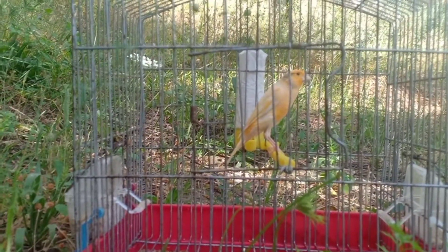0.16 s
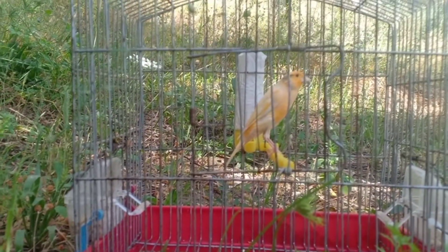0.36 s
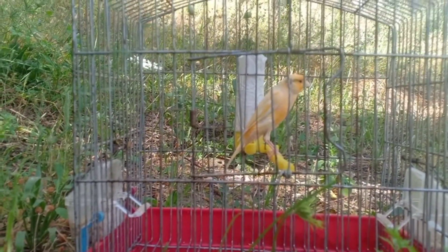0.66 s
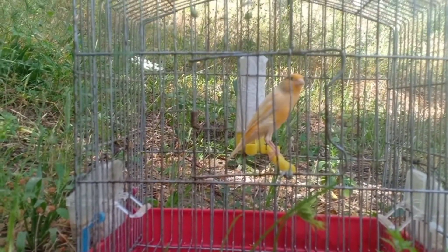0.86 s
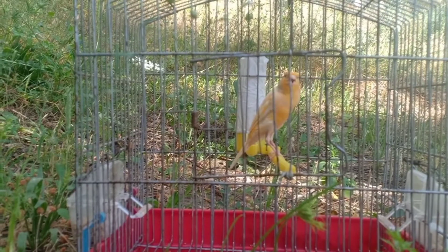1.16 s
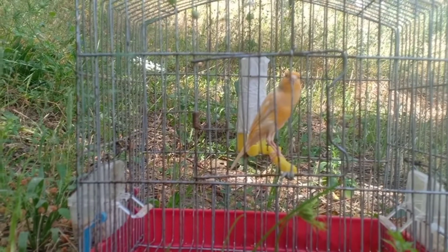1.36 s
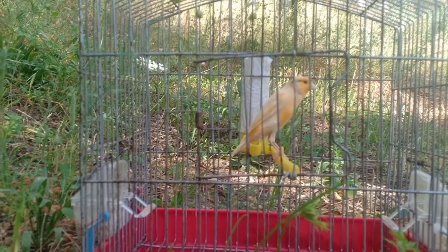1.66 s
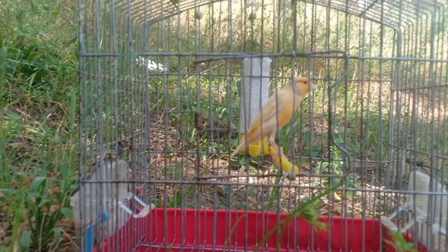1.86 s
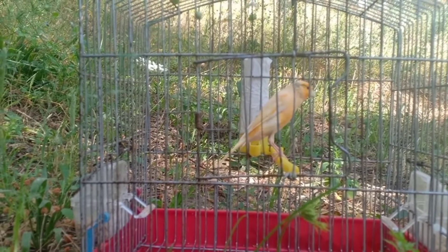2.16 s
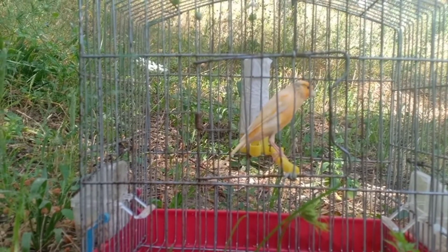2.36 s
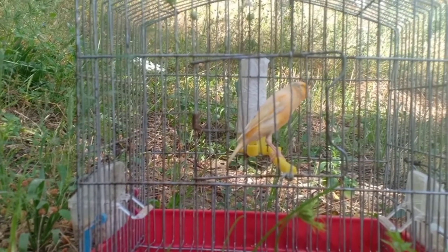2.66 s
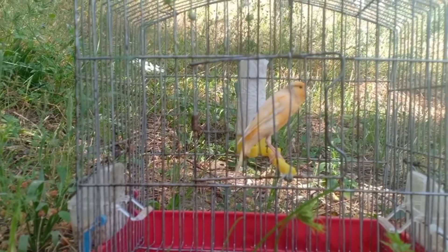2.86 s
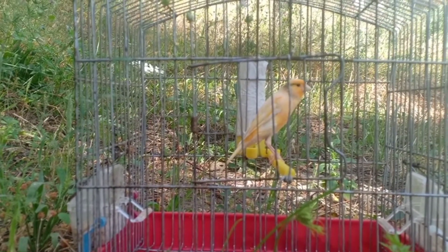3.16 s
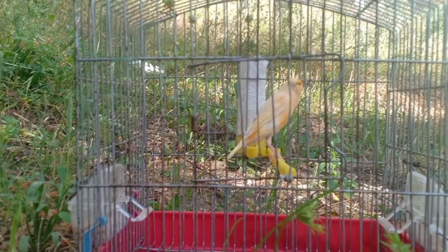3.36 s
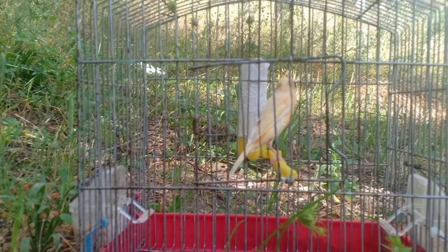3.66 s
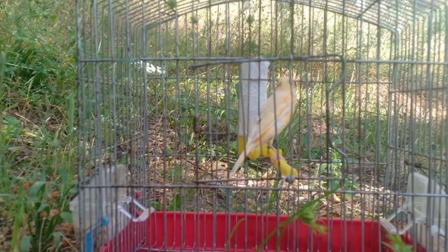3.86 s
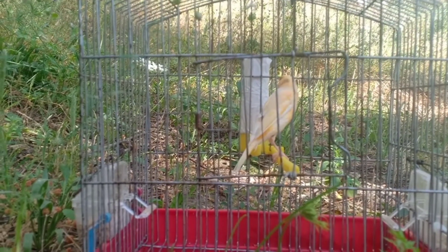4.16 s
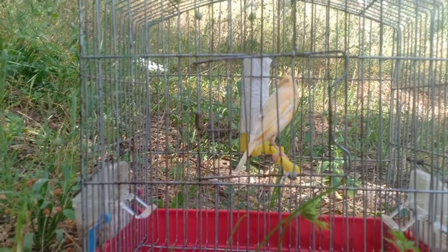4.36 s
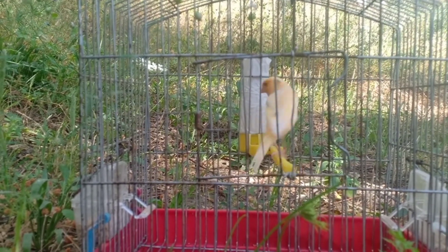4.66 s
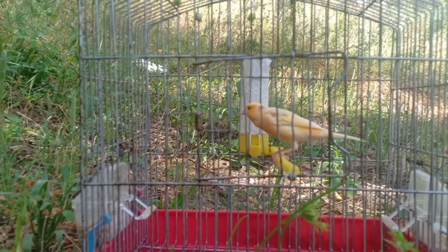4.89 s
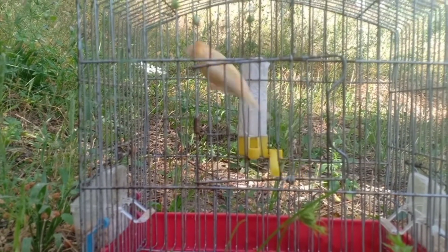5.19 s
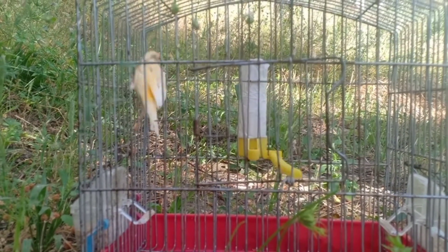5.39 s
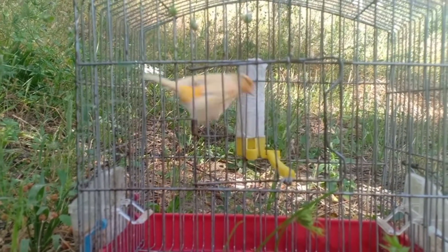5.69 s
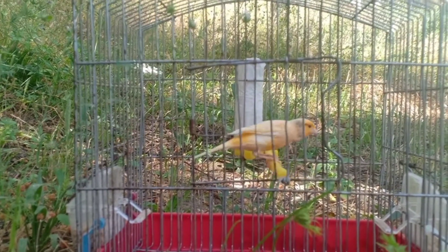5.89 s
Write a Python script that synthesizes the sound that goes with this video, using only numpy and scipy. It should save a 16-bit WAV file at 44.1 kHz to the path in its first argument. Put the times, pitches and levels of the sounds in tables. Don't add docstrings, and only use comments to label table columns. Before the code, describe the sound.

Close to a phone microphone, a small caged bird gives three short, buzzy, rising calls spaced about two seconds apart, the last weaker. Around it wild birds whistle and chip among echoing trees, over leaf hiss, low traffic hum and a thin cricket. Near the end the bird hops and flutters, with dull knocks and a brief wire rattle.

```python
import sys
import numpy as np
from scipy import signal
from scipy.fft import rfft, irfft, next_fast_len
from scipy.io import wavfile
from scipy.ndimage import uniform_filter1d, map_coordinates

SR = 44100
rng = np.random.default_rng(int(sys.argv[2]) if len(sys.argv) > 2 else 0)


def ratio_of_db(decibels):
    return 10 ** (np.asarray(decibels, float) / 20)


def transcribe(signal):
    frames = np.atleast_2d(signal).T
    limited = np.clip(frames, -1, 1)
    pcm = np.round(limited * 32767).astype(np.int16)
    wavfile.write(sys.argv[1], SR, pcm)


N = 265923
TIME = np.arange(N) / SR

# t/s, pitch f/Hz, effort level/dB, head turn (left minus right) level/dB
CALLS = [
    [(1.128, 950, -43, -4), (1.157, 1311, -14, -0.5), (1.171, 1423, -20, -1), (1.203, 1657, -14, -3),
     (1.242, 2010, -15, -0.5), (1.316, 2454, -14, 1), (1.358, 2765, -17, -5.5), (1.41, 3044, -20, 1.5),
     (1.445, 3410, -13, -0.5)],
    [(2.883, 980, -32.5, -2), (2.911, 1432, -18, 5.5), (2.947, 1495, -21, -8), (2.96, 1730, -19, -1.5),
     (2.997, 1996, -18, 5), (3.045, 2323, -17, 1), (3.072, 2630, -14, 1.5), (3.12, 2870, -18, 4),
     (3.161, 3020, -23.5, -10.5)],
    [(5.212, 1050, -32.5, -12), (5.238, 1387, -17, 3.5), (5.28, 1625, -20, -8), (5.32, 2019, -19, 6),
     (5.345, 2250, -18, -2.5), (5.38, 2455, -21.5, -14), (5.412, 2739, -24.5, -8.5),
     (5.472, 2993, -22.5, -8), (5.506, 3185, -23, -2)],
]
# f/Hz, level/dB
THROAT = [(900, -41.5), (1500, -26), (2050, -8.5), (2800, -3.5), (3400, -1), (4000, 3), (5100, -3),
          (6000, -18), (6700, -28.5), (8500, -43.5), (10000, -44.5), (11500, -30), (13000, -33.5),
          (15300, -25)]
# f/Hz, width f/Hz, level/dB
THROAT_DIPS = [(2420, 230, -13.5), (4610, 460, -7), (3466, 53, -8.5), (3330, 85, 3.5), (5050, 220, 5.5)]
PARTIAL_DB = [1, -1, -10, 0, -4.5, -10, -8, -7.5, -16.5, -17.5, -16.5, -21]
# left delay t/ms, right delay t/ms, level/dB
NEAR_ECHOES = [(1.25, 0.881, -14), (2.3, 3.2, -15), (5.1, 4.4, -12)]

# start t/s, length t/s, from f/Hz, to f/Hz, peak level/dB
THRUSH = [(.118, 0.012, 3650, 3050, -50), (.133, 0.029, 3050, 2150, -48.5), (.17, .05, 2600, 2200, -60.5),
          (.434, 0.034, 3050, 2065, -47), (.742, 0.029, 2500, 1900, -59.5), (.788, 0.02, 2060, 3040, -64),
          (.917, .013, 2630, 3850, -50), (.932, 0.047, 3200, 2350, -58), (1.4, 0.048, 2780, 2024, -58.5),
          (1.458, 0.03, 1980, 2900, -54), (1.815, .012, 2360, 3120, -49.5),
          (1.832, .018, 2430, 3350, -49.5), (1.998, 0.0074, 3900, 2400, -50),
          (2.197, 0.038, 2673, 2727, -50), (2.23, 0.032, 2710, 2050, -54), (2.28, 0.024, 2178, 2840, -48),
          (2.358, 0.026, 2230, 2060, -52), (2.44, 0.089, 3430, 2880, -50),
          (2.722, 0.067, 3714, 3420, -65.5)]
FINCH = [(.108, .02, 3650, 3900, -59), (.505, 0.038, 4870, 4300, -71), (.564, .021, 6360, 4430, -60),
         (.708, .036, 6450, 3750, -61.5), (1.568, .062, 4400, 3720, -66), (1.942, 0.054, 3950, 4780, -53.5),
         (0.393, 0.063, 6040, 5370, -79), (2.603, 0.014, 6060, 3700, -62.5), (.003, .02, 4100, 3600, -66),
         (.97, .04, 2447, 2110, -69), (5.305, .025, 1290, 1400, -57.5)]
FLICKS = [
    (1.699, 0.027, 3210, 6800, -63),
    (2.087, 0.022, 3050, 6630, -60.5),
    (2.625, .05, 5300, 6720, -69.5),
]
WHISTLER = [(.572, .06, 5270, 5730, -66), (1.568, 0.05, 2156, 1890, -64.5), (1.938, 0.035, 4680, 5050, -51),
            (4.955, .16, 1670, 2012, -58.5), (5.277, 0.035, 2388, 2380, -47),
            (5.405, 0.053, 2420, 2370, -51), (5.607, 0.059, 2470, 2390, -48.5),
            (5.658, 0.058, 2390, 2253, -50.5), (5.72, 0.062, 2280, 2328, -53)]
COUSIN = [
    (.2, .055, 1626, 1774, -79.5),
    (.25, .18, 1914, 2690, -73),
    (.43, .105, 3060, 3310, -75.5),
]
SCOLD = [
    (1.59, .045, 1060, 910, -66),
]
# t/s from start, share of the way from foot to peak (0-1), level/dB
WARBLE_SHAPE = [(0, .21, -2.5), (.02, .3, -3.5), (0.037, 0.62, -4.5), (0.048, 0.91, -6), (.066, .5, -1),
                (.09, 0, 7.5), (.106, .14, 1.5), (.145, .135, -23)]
# start t/s, level/dB, foot f/Hz, peak f/Hz, stretch (times)
WARBLES = [
    (4.394, -65, 3520, 6400, 0.98),
    (4.569, -60.5, 3330, 6760, 0.91),
    (4.749, -59.5, 3450, 6410, 0.88),
    (4.942, -60.5, 3340, 6930, .99),
    (5.159, -57, 3210, 7180, 1.23),
]

# t/s, tray ring level/dB, crack level/dB, crack length t/ms
KNOCKS = [(3.699, -63.5, -58, 3.5), (3.745, -64.5, -89, 3.5), (4.892, -61.5, -48.5, 13),
          (4.941, -65, -67, 3), (5.789, -84, -45, 9.8), (5.814, -74, -41, 2.9), (5.8329, -85, -27, 2.15),
          (5.839, -82, -54, 1.1), (5.909, -63, -44, 5.6), (5.96, -66.5, -71, 3)]
# f/Hz, level/dB, time to fall 60 dB t/s
CAGE_MODES = [(348, -3, 0.11), (419, -2, 0.083), (519, -3, 0.042), (637.4, -15, 0.031), (724, 0.5, 0.017),
              (930, -16, 0.04), (1178, -9.5, 0.031), (1418, -15, 0.04), (1660, -4, 0.025), (2470, 2, 0.013)]
# start t/s, peak t/s, end t/s, peak level/dB
RATTLES = [
    (4.857, 4.896, 5.24, -60),
    (5.273, 5.364, 5.68, -49.5),
    (5.626, 5.697, 5.86, -59.5),
    (5.857, 5.923, 6.1, -51.5),
]
GUSTS = [
    (0.224, 0.3, 0.72, -66),
    (2.18, 2.41, 2.62, -67),
]

# f/Hz, level/dB per Hz
GARDEN = [(12, -32), (20, -16), (32, -25.5), (50, -8.5), (95, -5.5), (171, -13.5), (298, -14), (687, -16),
          (1460, -20.5), (2850, -19.5), (4440, -30.5), (6500, -28.5), (9500, -36), (15600, -34.5)]
# f/Hz, likeness (0-1)
LIKENESS = [(60, .92), (130, .8), (290, .55), (640, .25), (1400, 0), (4400, 0), (8000, .75), (15000, .96)]
# t/s, half width t/s, level/dB
CHORUS_SWELLS = [(0, 0.21, 2.5), (1.7, 0.68, 0.5), (2.701, 0.75, 3), (3.8, 0.22, -0.5), (5.8, 0.5, 4.5)]


def unit(x):
    return x / np.sqrt(np.mean(x ** 2))


def along(table, hz):
    f, value = np.transpose(table)
    return np.interp(np.log(np.maximum(hz, 1)), np.log(f), value)


def band(x, lo_hz, hi_hz):
    return signal.sosfilt(signal.butter(2, [lo_hz, hi_hz], "band", fs=SR, output="sos"), x)


def walk(rate):
    hold = int(SR / rate)
    steps = np.repeat(rng.standard_normal(N // hold + 1), hold)
    return 1.56 * uniform_filter1d(uniform_filter1d(steps, hold), hold)[:N]


def span(s):
    return slice(int((s[0] - .01) * SR), int((s[-1] + .02) * SR))


def gate(t, s, fade_s):
    return np.clip(np.minimum(t - s[0], s[-1] - t) / fade_s + .5, 0, 1)


def swell(t, start, peak, end, db, rise_db, fall_db):
    return ratio_of_db(db + np.interp(t, [start, peak, end], [rise_db, 0, fall_db])) * gate(t, [start, end], 0.001)


def trees(x, t60, wet_db, gap_s):
    t = TIME[:SR // 2]
    fade = np.exp(-np.log(1000) * t / t60) * np.clip(t / gap_s, 0, 1)
    tail = rng.standard_normal((2, SR // 2)) * fade
    tail = tail / np.sqrt(np.sum(tail[0] ** 2))
    return ratio_of_db(wet_db) * signal.oaconvolve(x[None], tail, axes=1)[:, :N]


def garden():
    size = next_fast_len(N)
    hz = np.fft.rfftfreq(size, 1 / SR)
    like = np.clip(along(LIKENESS, hz), 0, .98)
    noise = rfft(rng.standard_normal((2, size))) * ratio_of_db(along(GARDEN, hz))
    mid, side = noise * np.sqrt([1 + like, 1 - like])
    ears = np.array([mid + side, mid - side])
    chorus_db = sum(db * np.exp(-((TIME - s) / wide) ** 2) for s, wide, db in CHORUS_SWELLS)
    out = 0
    for centre in 16 * 2. ** np.arange(11):
        share = np.clip(1 - np.abs(np.log2(np.maximum(hz, 1) / centre)), 0, 1)
        chorus = np.exp(-np.log2(centre / 4000) ** 2 / 3.0)
        out = out + irfft(ears * share, size)[:, :N] * ratio_of_db(1.5 * walk(4) + chorus * chorus_db)
    return ratio_of_db(-64) / np.std(irfft(mid, size)) * out * ratio_of_db([[.4], [-.4]])


def whistles(notes, peak=.4, rise_db=-8, fall_db=-12, bend=1.1, partials=((1, 0),)):
    out = np.zeros(N)
    for s, long, from_hz, to_hz, db in notes:
        now = span([s, s + long])
        t = TIME[now]
        hz = from_hz + (to_hz - from_hz) * np.clip((t - s) / long, 0, 1) ** bend
        phase = 2 * np.pi * np.cumsum(hz) / SR
        tone = sum(ratio_of_db(part_db) * np.sin(k * phase) for k, part_db in partials)
        out[now] += swell(t, s, s + peak * long, s + long, db, rise_db, fall_db) * tone
    return out


def wild_birds():
    thrush = whistles(THRUSH, 0.38, -6.5, -5.5, 1.0)
    finch = whistles(FINCH, 0.21, -6.5, -9, 0.67)
    flicks = whistles(FLICKS, 0.27, 5, -3.5, 0.17)
    whistler = whistles(WHISTLER, 0.3, -8, -1.5, .6)
    cousin = whistles(COUSIN, .6, 0, 4.5, 0.67, partials=[(1, 2.5), (2, -2.0), (3, -31)])
    scold = whistles(SCOLD, 0.53, -2, -2, 1.24, partials=[(2, -8), (3, -7.5), (4, -13), (5, 4.5), (6, -2.5)])
    out = 0
    # voice, direct left level/dB, direct right level/dB, echo t60 t/s, echo level/dB, left ear late by samples
    for voice, left_db, right_db, t60, wet_db, late in [
            (thrush, 4, 3, .28, 6, 20),
            (finch, 3, 3, .4, 9, -15),
            (flicks, 3, 3, .4, 9, -15),
            (whistler, 3, 3, .2, -4, 5),
            (cousin, 6, 6, .3, 1.5, 3),
            (scold, 1.5, 1.5, .15, 6, 3),
            (warbler(), 6, 6, .2, -1.5, -18)]:
        voice = voice * ratio_of_db(2.4 * walk(90))
        direct = np.array([np.roll(voice, late), voice]) * ratio_of_db([[left_db], [right_db]])
        out = out + direct + trees(voice, t60, wet_db, 0.0027)
    return out


def cricket():
    start_s, period_s, pulse_hz = 0.16, .2545, 50.17
    strokes = np.diff(np.floor(TIME * pulse_hz), prepend=0) + .03 * rng.standard_normal(N)
    chirp = (.5 + .5 * np.cos(2 * np.pi * (TIME - start_s) / period_s)) ** 1.5
    return ratio_of_db(-87.5) * chirp * unit(band(strokes, 13300, 15500)) * np.ones((2, 1))


def wind():
    puffs = unit(band(rng.standard_normal((2, N)), 186, 580)) * ratio_of_db(0.85 * walk(30.1) + 6.5)
    return puffs * sum(swell(TIME, *gust, -11, -9) for gust in GUSTS)


def throat_db(hz):
    dips_db = sum(db * np.exp(-((hz - centre) / width) ** 2) for centre, width, db in THROAT_DIPS)
    return along(THROAT, hz) + dips_db


def caged_bird():
    thin_from_hz, thin_db_per_khz, let_go_s, let_go_db = 3000, -70, 0.015, -30.5
    out, bare = np.zeros((2, N)), np.zeros(N)
    flutter, wobble = walk(300), walk(120)
    beads = np.array([np.roll(wobble, 5000 * k) for k in range(12)])
    length = next_fast_len(N)
    air_db = .6 * throat_db(np.fft.rfftfreq(length, 1 / SR))
    air = unit(irfft(rfft(rng.standard_normal(length)) * ratio_of_db(air_db), length))
    order = np.arange(1, 13)[:, None]
    for call in CALLS:
        s, *columns = np.transpose(call)
        ends = [s[0], s[-1] + let_go_s]
        now = span(ends)
        t = TIME[now]
        hz, effort_db, pan_db = (np.interp(t, s, c) for c in columns)
        effort_db += let_go_db * np.clip((t - s[-1]) / let_go_s, 0, 1) ** 2.5
        hoarse = 0.079 + 0.55 * np.exp(-(np.maximum(t - s[0], 0) / 0.071) ** 2)

        thin_db = thin_db_per_khz * np.maximum(hz - thin_from_hz, 0) / 1000
        size_db = throat_db(order * hz) + np.c_[PARTIAL_DB] + 0.02 * (order + 2)
        size_db = size_db + thin_db * (order == 2) + 3.2 * (order > 2) * beads[:, now]
        size = ratio_of_db(size_db) * (order * hz < SR / 2.2)
        shaky_hz = hz * (1 + 0.0034 * wobble[now] + 0.04 * hoarse * flutter[now])
        phase = 2 * np.pi * np.cumsum(shaky_hz) / SR
        tone = np.sum(size * np.sin(order * phase), 0)
        loud = np.sqrt(np.sum(size ** 2, 0) / 2)

        voiced = np.clip((t - s[0] - .006) / 0.0066, .1, 1)
        tone = voiced * tone * (1 - 0.798 * hoarse * np.abs(flutter[now]))
        breath = ratio_of_db(-10) * hoarse ** 1.34 * loud * air[now]
        voice = (tone + breath) * ratio_of_db(effort_db) * gate(t, ends, 0.002)
        bare[now] = voice
        for ear, side_db in enumerate([pan_db, -pan_db]):
            heard = voice.copy()
            for *ms, db in NEAR_ECHOES:
                earlier = np.arange(len(t)) - ms[ear] * SR / 1000
                heard += ratio_of_db(db) * map_coordinates(voice, [earlier], order=3)
            out[ear, now] = heard * ratio_of_db(side_db / 2)
    return out + trees(bare, 0.13, -22, .004) + trees(bare, .55, -38, 0.076)


def cage():
    push, crack = np.zeros(N), np.zeros(N)
    after = TIME[:2000]
    for s, ring_db, crack_db, ms in KNOCKS:
        shake, burst = rng.standard_normal((2, 2000))
        now = slice(int(s * SR), int(s * SR) + 2000)
        push[now] += ratio_of_db(ring_db - 24.5) * uniform_filter1d(shake, size=44) * 4 * np.exp(-after / 0.04)
        crack[now] += ratio_of_db(crack_db) * (burst + 0.21) * np.exp(-after * 1000 / ms)
    taps = rng.standard_normal(N) * (rng.random(N) < 1500 / SR)
    push += sum(swell(TIME, *rattle, -23, -8) for rattle in RATTLES) * ratio_of_db(-11.5) * taps
    ring = np.zeros(N)
    for k, (hz, db, t60) in enumerate(CAGE_MODES):
        turn = np.exp((2j * np.pi * hz - np.log(1000) / t60) / SR)
        ring += (-1) ** k * ratio_of_db(db) * signal.lfilter([1], [1, -turn], push).imag
    both = band(ring, 370, 4000) + band(crack, 125, 2870)
    return both * ratio_of_db([[.6], [-.6]]) + trees(both, 0.069, -3.5, 0.006)


def warbler():
    out = np.zeros(N)
    after, share, db = np.transpose(WARBLE_SHAPE)
    for start, top_db, foot_hz, peak_hz, stretch in WARBLES:
        s = start + after * stretch
        now = span(s)
        t = TIME[now]
        hz = foot_hz + (peak_hz - foot_hz) * np.interp(t, s, share)
        phase = 2 * np.pi * np.cumsum(hz) / SR
        out[now] += ratio_of_db(top_db + np.interp(t, s, db)) * gate(t, s, .003) * np.sin(phase)
    return out


def scene():
    return garden() + wild_birds() + cricket() + wind() + caged_bird() + cage()


def top_cut(x):
    return signal.sosfilt(signal.butter(12, 15710, fs=SR, output="sos"), x)


def record(dry):
    low_pass = signal.ellip(10, .2, 80, 15500, fs=SR, output="sos")
    mix = signal.sosfilt(low_pass, dry) + .001
    return top_cut(mix)


dry = scene()
out = record(dry)
transcribe(out)
```